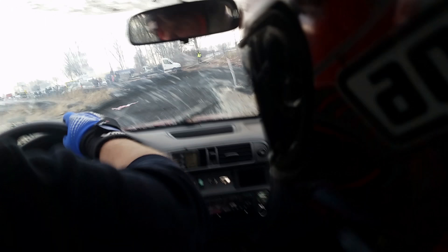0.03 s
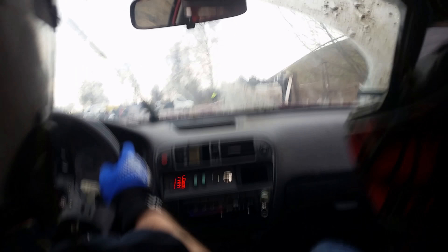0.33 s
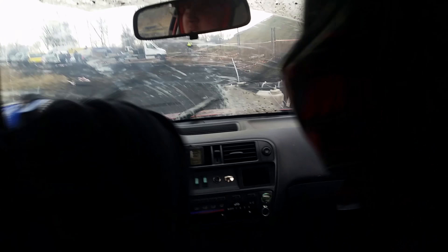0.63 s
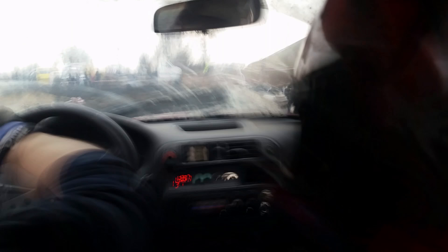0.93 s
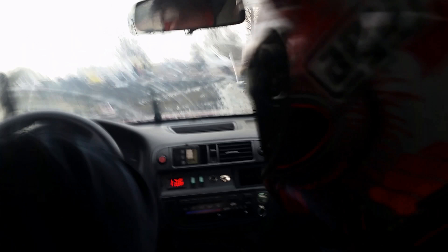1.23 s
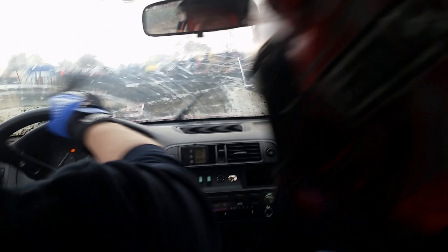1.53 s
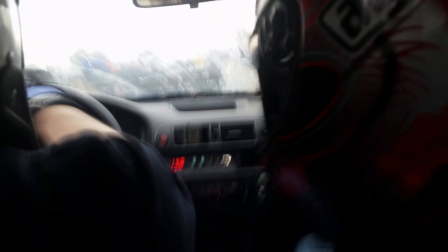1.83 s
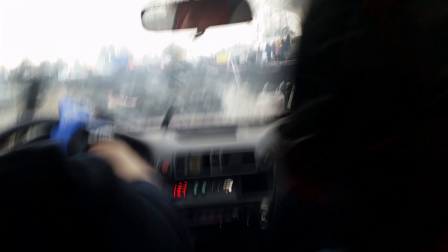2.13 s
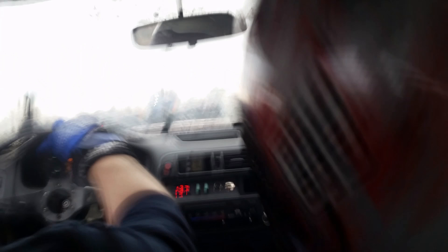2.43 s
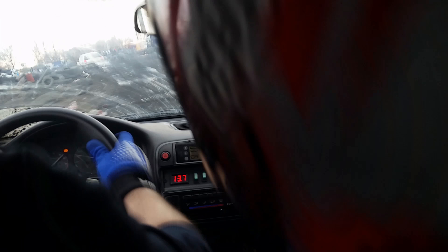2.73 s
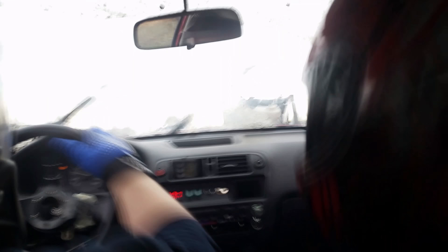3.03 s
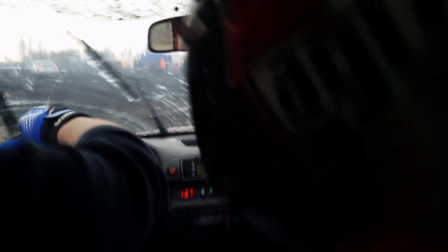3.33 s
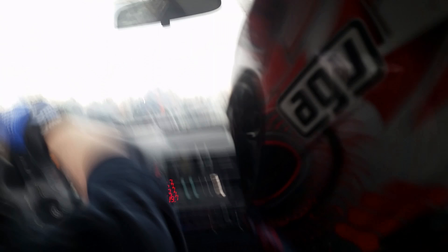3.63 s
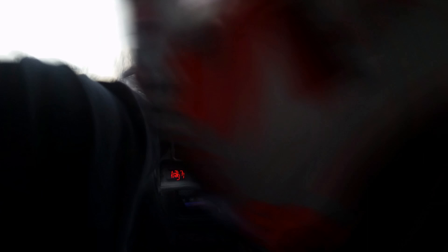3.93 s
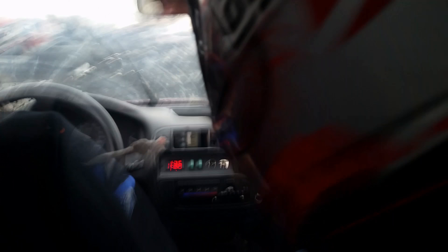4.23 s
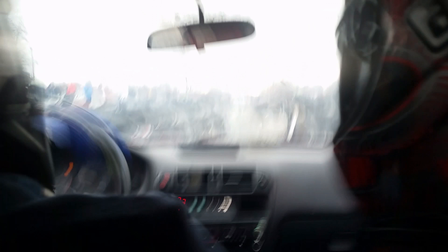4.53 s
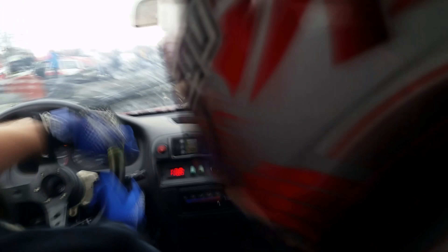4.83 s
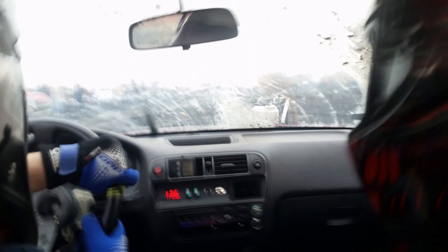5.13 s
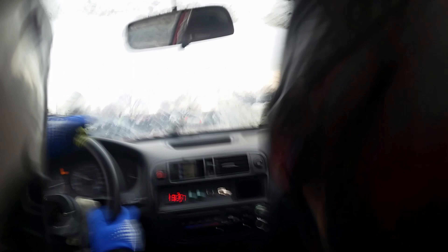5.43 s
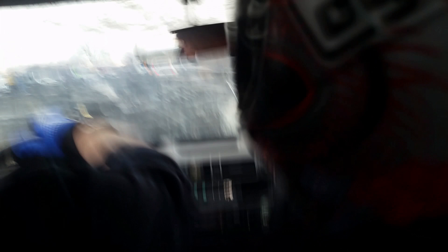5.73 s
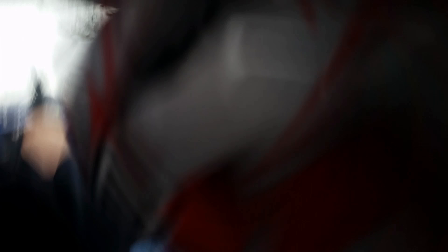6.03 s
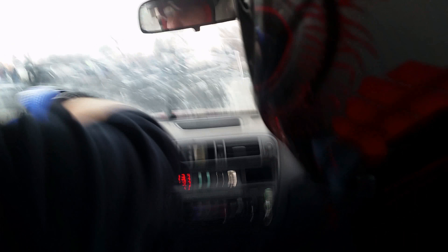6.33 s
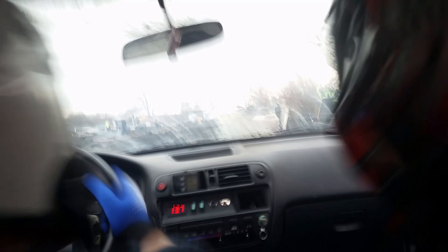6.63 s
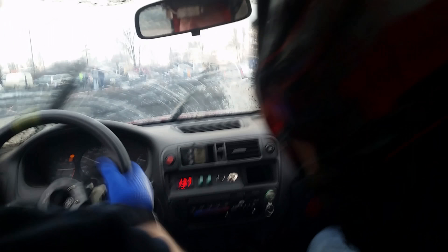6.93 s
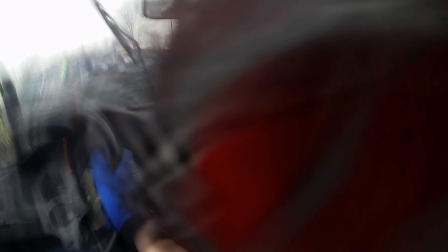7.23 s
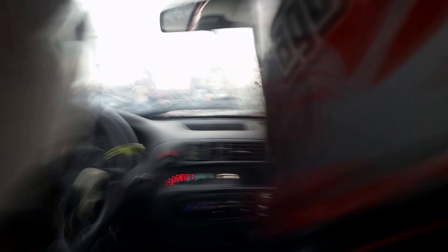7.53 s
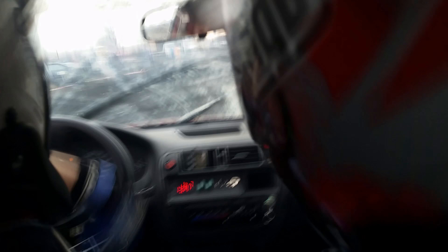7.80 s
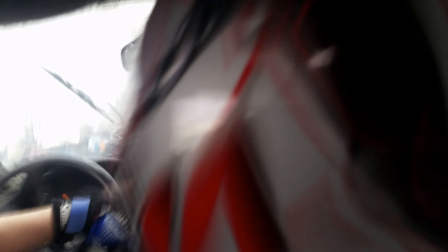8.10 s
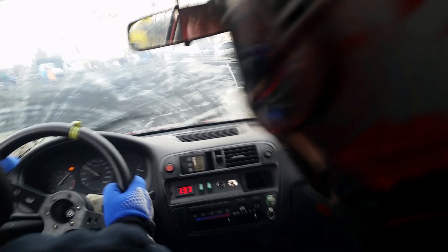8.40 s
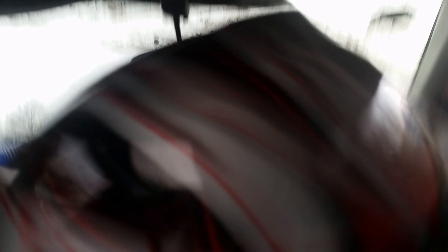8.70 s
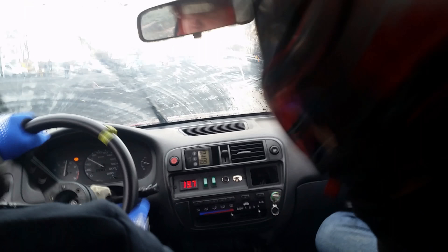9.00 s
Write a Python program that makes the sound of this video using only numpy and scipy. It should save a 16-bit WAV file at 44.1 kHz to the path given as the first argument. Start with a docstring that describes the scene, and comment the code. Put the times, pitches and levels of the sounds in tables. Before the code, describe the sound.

Inside a car driven hard over rutted mud, a huge exhaust boom fills the cabin and distorts the microphones. The snarling engine eases early, then revs high again, repeatedly cutting out for an instant and barking back, with one sharp backfire pop midway. Knocks from the suspension, low tyre rumble and small rattles sit under the drone, which drops in pitch at the close.

```python
"""A huge exhaust boom fills a stripped four-cylinder car driven flat out over rutted mud.
The cabin booms at the firing rate; each firing knocks on the bulkhead, so the engine snarls, and it
stumbles and barks as the rev limiter cuts the fuel. Ruts thud through the body and loose metal jingles.
Two microphones overload, the right one more, so the boom chops everything else."""
import sys
import numpy as np
from scipy import signal
from scipy.fft import rfft, irfft, next_fast_len
from scipy.io import wavfile
from scipy.ndimage import uniform_filter1d

SR = 44100
rng = np.random.default_rng(int(sys.argv[2]) if len(sys.argv) > 2 else 0)


def dump_mix(stems):
    """Bounce the given channels to the path in sys.argv[1] as a 16-bit WAV at rate SR."""
    frames = np.atleast_2d(stems).T  # one column per channel
    limited = np.clip(frames, -1, 1)  # hard clip at full scale
    pcm = np.round(limited * 32767).astype(np.int16)
    wavfile.write(sys.argv[1], SR, pcm)


N = 403956
TIME = np.arange(N) / SR

# Engine speed as the driver and the ruts set it. Each row: time in seconds, firing rate in Hz.
ENGINE_SPEED = [(0, 221.2), (.22, 213.9), (.79, 224.9), (1.08, 174.6), (1.22, 184.3), (1.48, 168.4),
                (1.68, 147.5), (1.94, 159.8), (2.22, 183.2), (2.45, 166.4), (2.85, 188), (3.08, 172.1),
                (3.37, 211.8), (3.56, 224.3), (3.78, 192.5), (4.14, 218.8), (4.5, 191.4), (4.94, 223.8),
                (5.46, 203.9), (5.72, 222.2), (5.97, 199.3), (6.4, 222), (6.58, 210.2), (6.95, 223),
                (7.45, 215.8), (7.9, 219.6), (8.24, 168), (8.37, 185.5), (8.8, 135.5), (9.12, 151.9)]
# The mix follows the revs. Each row: firing rate in Hz, then relative levels in dB of boom, snarl,
# rasp, block shake and ground rumble.
MIX_BY_REVS = [(134, 4, -33.5, -28, -36.5, -30.5), (149.2, 2, -32.5, -27, -46.5, -30.5),
               (162, 2, -28, -27, -25, -33.5), (177.3, 1, -29.5, -28.5, -17.5, -30.5),
               (212, -0.5, -29, -27, -15.5, -25), (223, 0, -28.5, -30, -16, -26.5)]
# The wheels spin up until the limiter cuts the fuel. Each row: start and length in seconds,
# dip of the whole engine in dB, relative level in dB of the bark as it fires again.
FUEL_CUTS = [(.538, .099, -9.5, -7), (4.215, .081, -7.5, -21), (4.835, 0.049, -3.5, -17),
             (5.722, 0.057, -7.5, -19), (6.348, .046, -6, -11.5), (6.893, 0.052, -6, -12.5),
             (7.177, 0.062, -7.5, -15), (7.71, 0.05, -1.5, -20), (7.916, .066, -4.5, -13.5)]
# The driver eases off. Each row: centre and half length in seconds, dip of the snarl in dB.
THROTTLE_LIFTS = [(1.301, 0.049, -15.5), (1.593, .048, -21.5)]
# Slow swell of the exhaust boom. Each row: time in seconds, relative level in dB.
BOOM_SWELL = [(0, -11), (.5, -1.5), (.7, -8.5), (.85, -14.5), (1.02, -17), (1.08, -3.5), (1.9, -4),
              (2.8, -9), (3.14, -6.5), (3.35, -12.5), (3.7, -6.5), (4.05, -15), (4.35, -9), (4.75, -12),
              (5.05, -8.5), (5.55, -10.5), (6.7, -9.5), (7.14, -4.5), (7.3, -10), (7.8, -12), (8.2, -3),
              (8.7, -8.5), (9.16, -7.5)]
# How the cabin carries the boom's overtones. Each row: frequency in Hz, relative gain in dB.
CABIN_RESPONSE = [(265, -12), (300, -9), (335, -17), (385, -14.5), (435, -10.5), (470, -15), (550, -10.5),
                  (610, -14.5), (700, -25)]
# Unequal cylinders, in firing order. Each entry: relative strength in dB.
CYLINDER_DB = [2.5, -18, 2, -2.5]
# Nasal engine barks, and one sharp backfire pop during a fuel cut.
# Each row: start in seconds, relative level in dB, t60 in seconds.
BARKS_AND_BACKFIRE = [(3.36, -11, 0.36), (4.147, -15.5, 0.16), (4.248, 3, 0.034), (4.75, -18, 0.23),
                      (7.455, -11, .08)]
# Tones of the shaking block. Each row: multiple of the firing rate, relative level in dB.
BLOCK_TONES = [(.25, -16), (.5, 2), (.75, -14), (1.25, -19.5), (1.5, -11), (1.75, -26), (2.5, -12)]
# Bumps hit the body. Each row: start in seconds, relative level in dB, t60 in seconds.
BODY_BUMPS = [(.78, -9, 0.21), (.894, -13.5, 0.17), (.936, -0.5, 0.53), (0.976, -1.5, .14),
              (2.529, -2.5, 0.12), (3.11, -9, 0.2), (3.385, -11, 0.067), (3.6, -6.5, 0.16),
              (3.765, -0.5, .18), (3.824, 5.5, .16), (3.891, -4.5, 0.16), (4.307, -15, .11),
              (4.477, -3, 0.12), (4.548, -9.5, 0.17), (4.636, -2.5, 0.081), (5.08, -10, 0.12),
              (5.346, -1.5, 0.035), (5.978, 3.5, .1), (6.034, 1, 0.079), (6.62, 2, 0.14), (7.191, 4, 0.026),
              (7.27, -3, 0.16), (7.295, 2.5, .17), (7.412, 3.5, .1), (7.501, -3, 0.089), (7.57, -0.5, 0.15),
              (7.649, -2.5, 0.19), (7.68, 3.5, .07), (7.79, -4, 0.2), (7.984, -8, .1), (8.18, -1.5, 0.07),
              (8.679, -8, 0.48), (8.744, -9, 0.12)]
# The body heaves on its springs. Each row: centre in seconds, relative rumble level in dB.
BODY_HEAVES = [(.81, -13.5), (1.015, -12.5), (2.326, -24), (2.52, -16.5), (2.931, -21.5), (3.031, -15),
               (3.62, -23), (4.39, -19), (4.871, -19), (5.521, -20.5), (6.67, -24.5), (7.431, -18.5),
               (7.77, -18), (8.0, -20.5)]
# Jolts of loose metal. Each row: start in seconds, relative level in dB.
METAL_JOLTS = [(3.109, -27), (3.1335, -24), (3.2201, -25), (3.5956, -24), (3.6946, -29), (3.9631, -31),
               (4.105, -25), (5.0, -28), (6.744, -31), (6.7765, -28), (7.01, -28)]
# The metal's ring. Each row: frequency in Hz, relative level in dB, t60 in seconds.
METAL_MODES = [(10800, -20, .05), (11420, -12, .04), (12060, -5, .04), (12590, 9, .075), (13000, -10, .035),
               (13600, -7.5, .04), (15300, -13, .03)]
# Grit and trim click. Each row: start in seconds, relative level in dB.
TRIM_CLICKS = [(2.5344, -22), (3.8308, -10), (4.482, -28), (5.2226, -20), (5.4919, -22), (5.9644, -20.5),
               (6.0384, -24), (7.4949, -19), (7.648, -20), (7.7585, -23), (7.793, -18), (7.8022, -16),
               (7.8117, -18), (8.07, -14)]

# The tone of each layer. Each row: frequency in Hz, relative gain in dB.
SNARL_EQ = [(150, -21), (280, -5), (450, -2.5), (700, -1.5), (1000, -8), (1450, -15), (2200, -21.5),
            (4000, -28), (8000, -49.5)]  # knocks on the bulkhead
BARK_EQ = [(200, -13.5), (450, -0.5), (800, 1), (1050, -8), (1450, 7), (2000, -13), (4000, -22.5),
           (7000, -35), (10000, -50)]  # nasal barks and the backfire
RASP_EQ = [(300, -18.5), (800, 6.5), (1350, 3.5), (1900, -3.5), (3000, -10), (5000, -17.5), (7000, -24),
           (9000, -28.5), (16000, -38)]  # gas and valves
RUMBLE_EQ = [(8, -10), (16, 1.5), (28, 4), (45, 2), (70, -2), (100, -3), (170, -8), (300, -18.5),
             (600, -21.5), (1200, -34), (4000, -70)]  # tyres in the ruts
THUD_EQ = [(12, 0.5), (30, 9), (60, 5), (150, 3.5), (350, 0.5), (700, -4), (1500, -20.5), (3000, -22.5),
           (6000, -36.5), (10000, -43), (16000, -45.5)]  # blows through the suspension
GRIT_EQ = [(1000, -23.5), (3500, 4), (7000, -2), (10000, -1), (16000, 1.5)]  # grit and trim
SHADE_EQ = [(40, 3.5), (100, -1), (180, -5.5), (300, -3.5), (600, -13), (1400, -10), (4000, -15),
            (8000, -16.5), (16000, -5.5)]  # the shaded left microphone against the right
HISS_EQ = [(300, -12.5), (1200, -4.5), (2500, -3.5), (5000, -17), (7300, -25.5), (8500, -22.5),
           (16000, -35.5)]  # the microphones' own hiss
OUTPUT_EQ = [(30, -2.5), (500, 0.5), (2000, -0.5), (4000, -1), (7000, -0.5), (8500, -5), (11000, -6),
             (13000, -4.5), (16000, -5)]  # colour of the whole mix


def exhaust(firings, hz, boom_db):
    """The cabin booms almost purely at the firing rate; overtones swell where they meet a resonance."""
    angle = 2 * np.pi * firings
    second_gain = undb(np.interp(2 * hz, *np.transpose(CABIN_RESPONSE)) + 3 * walk(30))
    third_gain = undb(np.interp(3 * hz, *np.transpose(CABIN_RESPONSE)) - 10 + 4 * walk(15))
    second = second_gain * np.sin(2 * angle + .5 * walk(12))
    third = third_gain * np.sin(3 * angle + .6 * walk(40))
    return (np.sin(angle) + second + third) * undb(boom_db + 7.5 + 1.4 * walk(60))


def snarl(firings, snarl_db, rasp_db, flare, scatter_db=2, cabin_t60=.061):
    """Each firing knocks on the bulkhead, rings in the cabin and feeds the barks; gas and valves rasp."""
    onsets = np.flatnonzero(np.diff(np.floor(firings)) > 0)
    scatter = scatter_db * rng.standard_normal(4096)[:len(onsets)]
    pulses = np.zeros(N)
    pulses[onsets] = undb(np.resize(CYLINDER_DB, len(onsets)) + scatter)
    t = TIME[:SR // 8]
    knock = 0
    for _ in range(4):  # the swaying microphones keep meeting other reflections
        cabin = rng.standard_normal((2, len(t))) * fade(t, cabin_t60)
        sway = np.sin(2.34 * walk(6) + 2 * np.pi * rng.random())
        knock = knock + sway * signal.oaconvolve(pulses[None], cabin, axes=1)[:, :N]
    bulkhead = unit(colour(knock, SNARL_EQ)) * undb(snarl_db + 13.5)
    bark = barks(knock, flare)
    pulsing = unit(np.exp(.11 * np.cos(np.pi * firings) + .2 * np.cos(2 * np.pi * firings)))
    rasp = noise(RASP_EQ) * pulsing * undb(rasp_db + 5 + 1.1 * walk(90))
    return bulkhead + bark + rasp


def barks(knock, flare, refire_t60=.45):
    """Pulses bark through the intake near the limit and after cuts; stray barks and a backfire join."""
    refires = [(s + length, db, refire_t60) for s, length, _, db in FUEL_CUTS]
    envelope = blows(refires + BARKS_AND_BACKFIRE, rise_s=.0012) + flare * undb(-23)
    return (unit(colour(knock, BARK_EQ)) * undb(-7) + noise(BARK_EQ) * undb(-8.5)) * envelope


def rev_limiter(climb_s=.2, sag_s=.06):
    """The flare of revs into each fuel cut (0-1), and the dip in level while the fuel is off (dB)."""
    flares = [np.interp(TIME, [s - climb_s, s, s + sag_s], [0, 1, 0]) for s, *_ in FUEL_CUTS]
    cut_db = sum(db * ((TIME > s) & (TIME < s + length)) for s, length, db, _ in FUEL_CUTS)
    return np.max(flares, axis=0), uniform_filter1d(cut_db * 1., size=200)


def engine_block(firings, shake_db):
    """The engine shakes the body at multiples of its four-stroke cycle; each tone wavers."""
    shake = 0
    for multiple, db in BLOCK_TONES:
        gain = undb(db + 1.5 * walk(25))
        cycles = multiple * firings + .12 * walk(30) + rng.random()
        shake = shake + gain * np.sin(2 * np.pi * cycles)
    return shake * undb(shake_db + 7)


def ground(rumble_db, small_bumps_per_s=2, small_t60=.2):
    """Tyres plough the ruts: the rumble lurches as the body heaves; bumps thud through the suspension."""
    cut_heaves = [(s, -23) for s, *_ in FUEL_CUTS]  # every fuel cut rocks the body too
    heaves = sum(undb(db) * swell(s, half_length=.028) for s, db in BODY_HEAVES + cut_heaves)
    rumble = noise(RUMBLE_EQ, shared=.79) * (undb(rumble_db) + heaves) * undb(18.5 + 2.35 * walk(18))
    starts = np.cumsum(rng.exponential(size=100)) / small_bumps_per_s
    small_bumps = [(s, rumble_db[int(s * SR)] + 7.5, small_t60) for s in starts[starts < TIME[-1]]]
    hits = blows(BODY_BUMPS + small_bumps, rise_s=.0012)
    thuds = noise(THUD_EQ, shared=.27) * hits * undb(4.5 + .73 * walk(120))
    return rumble + thuds


def loose_metal(detune=.008, contact_t60=.034):
    """Each jolt scuffs loose metal, which rings a little differently every time."""
    t = TIME[:SR // 5]
    jingles = np.zeros((2, N + len(t)))
    for s, jolt_db in METAL_JOLTS:
        ring = 0
        for hz, db, t60 in METAL_MODES:
            gain = undb(db + 3 * rng.standard_normal())
            detuned_hz = hz * (1 + detune * rng.standard_normal())
            ring = ring + gain * fade(t, t60) * np.sin(2 * np.pi * detuned_hz * t)
        contact = rng.standard_normal((2, len(t))) * fade(t, contact_t60)
        clink = signal.fftconvolve(contact, unit(ring)[None], axes=1)[:, :len(t)] / np.sqrt(len(t))
        start = int(s * SR)
        jingles[:, start:start + len(t)] += undb(jolt_db - 1.5) * clink
    return jingles[:, :N]


def grit(shake_db, grains_per_s=90):
    """Grit chatters as the body shakes and when bumps throw it up; grit and trim also click sharply."""
    grains = (rng.random(N) < grains_per_s / SR) * undb(4 * np.minimum(rng.exponential(size=N), 4))
    patter = unit(signal.oaconvolve(grains, fade(TIME[:SR // 5], t60=.015))[:N])
    thrown = blows([(s, db - 33.5, .35) for s, db, _ in BODY_BUMPS], rise_s=.01)
    chatter = patter * (undb(shake_db - 29) + thrown)
    clicks = blows([(s, db + 3, .014) for s, db in TRIM_CLICKS], rise_s=.00038)
    return noise(GRIT_EQ) * (chatter + clicks)


def undb(db):
    """Decibels to gain."""
    return 10 ** (np.asarray(db) / 20)


def unit(x):
    """Scale to rms 1."""
    return x / np.sqrt(np.mean(x ** 2, axis=-1, keepdims=True))


def colour(x, eq):
    """Filter through an EQ curve of (Hz, dB) points."""
    hz, db = np.transpose(eq)
    size = next_fast_len(x.shape[-1])
    bin_hz = np.maximum(np.fft.rfftfreq(size, 1 / SR), 1)
    gain = undb(np.interp(np.log(bin_hz), np.log(hz), db))
    return irfft(rfft(x, size) * gain, size)[..., :x.shape[-1]]


def noise(eq, shared=0.):
    """Coloured stereo noise at rms 1; shared is the part of its power common to both sides."""
    left, right, centre = rng.standard_normal((3, N))
    return unit(colour(np.sqrt(1 - shared) * np.array([left, right]) + np.sqrt(shared) * centre, eq))


def walk(rate):
    """A smooth random wobble at rms 1, through rate random points a second."""
    points = rng.standard_normal(4096)
    zigzag = np.interp(TIME * rate, np.arange(len(points)), points)
    return unit(uniform_filter1d(zigzag, int(SR / rate / 2)))


def fade(t, t60):
    """Exponential decay, 60 dB in t60 seconds."""
    return np.exp(-np.log(1000) * t / t60)


def blows(rows, rise_s):
    """An envelope of hits. Each row: start in seconds, level in dB, t60 in seconds."""
    envelope = np.zeros(N)
    for s, db, t60 in rows:
        start = int(s * SR)
        t = TIME[:min(N - start, SR // 2)]
        envelope[start:start + len(t)] += undb(db) * (1 - np.exp(-t / rise_s)) * fade(t, t60)
    return envelope


def swell(s, half_length):
    """A smooth rise and fall around time s, height 1."""
    return np.exp(-((TIME - s) / half_length) ** 2)


def overload(x, ceiling, knee):
    """Flatten the crests at a doubled sample rate; a higher knee clips harder."""
    fine = signal.resample_poly(x, 2, 1, axis=1)
    flattened = fine / (1 + np.abs(fine / ceiling) ** knee) ** (1 / knee)
    return signal.resample_poly(flattened, 1, 2, axis=1)


def scene(limit_hz=233.9, left_lag_s=.00052):
    """The revs drive the mix at two microphones; the left one lies further off and shaded."""
    flare, cut_db = rev_limiter()
    driven_hz = np.interp(TIME, *np.transpose(ENGINE_SPEED))
    hz = (driven_hz + flare * (limit_hz - driven_hz)) * (1 + .006 * walk(60))
    firings = np.cumsum(hz) / SR  # running count of cylinder firings
    rev_hz, *faders = np.transpose(MIX_BY_REVS)
    boom_db, snarl_db, rasp_db, shake_db, rumble_db = (np.interp(hz, rev_hz, db) for db in faders)
    swell_db = np.interp(TIME, *np.transpose(BOOM_SWELL))
    lift_db = sum(db * swell(s, half_length) for s, half_length, db in THROTTLE_LIFTS)
    # in a fuel cut, snarl and boom duck further than the engine as a whole
    load_db = lift_db + .9 * cut_db + .45 * (swell_db - swell_db.mean()) + .94 * walk(14)
    boom_ride_db = swell_db + .48 * lift_db + 1.4 * cut_db + 1.05 * walk(16)
    boom = exhaust(firings, hz, boom_db + boom_ride_db)
    shake = engine_block(firings, shake_db + lift_db)
    growl = snarl(firings, snarl_db + load_db, rasp_db + load_db, flare)
    engine = (boom + shake + growl) * undb(cut_db)
    left, right = engine + ground(rumble_db + .087 * cut_db) + loose_metal() + grit(rumble_db + cut_db)
    return np.array([np.interp(TIME - left_lag_s, TIME, colour(left, SHADE_EQ)), right])


def record(dry, low_cut_hz=90, leak_hz=1200, top_hz=15750):
    """The microphones stick at their limit, the wind filter lets each plateau sag, the output clips."""
    stuck = overload(dry, ceiling=.66, knee=4.96)
    sagging = signal.sosfilt(signal.butter(2, low_cut_hz, "high", fs=SR, output="sos"), stuck)
    clipped = overload(sagging * undb(3), ceiling=.85, knee=15)
    # a little treble and a steady hiss ride on even the flattened crests
    treble = signal.sosfilt(signal.butter(2, leak_hz, "high", fs=SR, output="sos"), dry)
    leak = overload(treble, ceiling=.12, knee=2.4) * undb(-12)
    hiss = noise(HISS_EQ) * undb([[-47], [-36]])  # left, right
    mix = colour(clipped + leak + hiss, OUTPUT_EQ)
    return signal.sosfilt(signal.ellip(10, .1, 80, top_hz, fs=SR, output="sos"), mix)


dry = scene()
out = record(dry)
dump_mix(out)
```